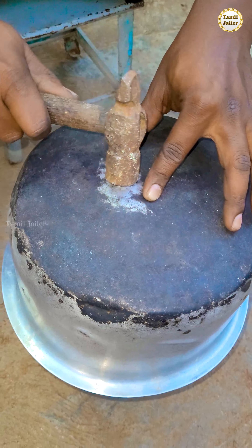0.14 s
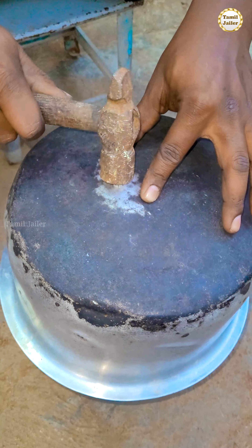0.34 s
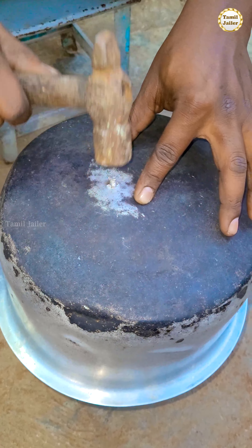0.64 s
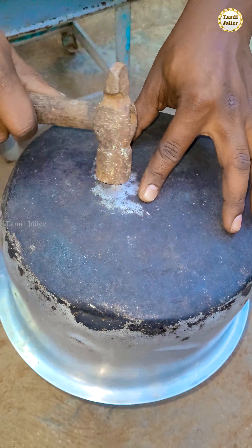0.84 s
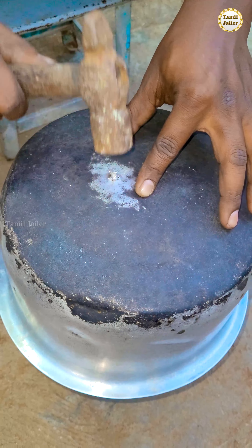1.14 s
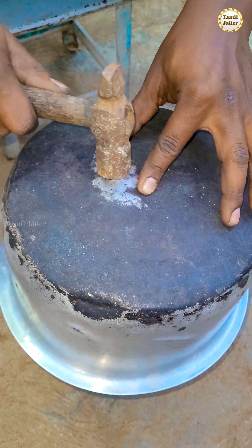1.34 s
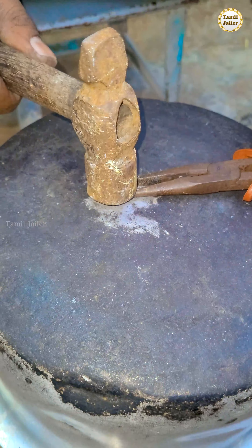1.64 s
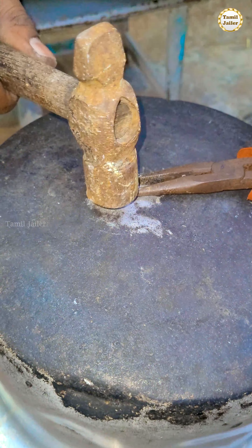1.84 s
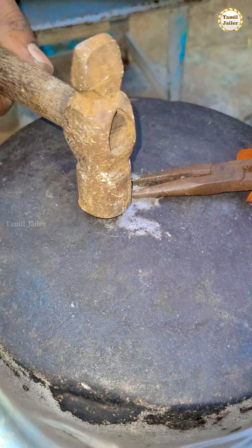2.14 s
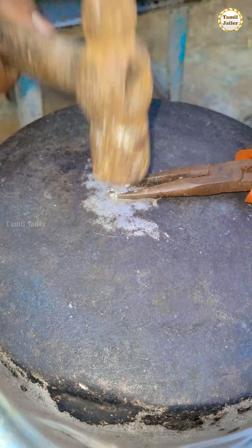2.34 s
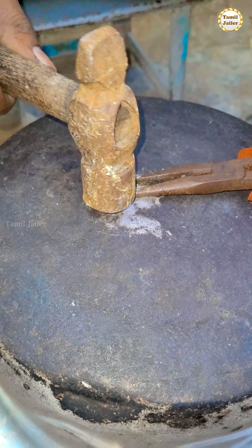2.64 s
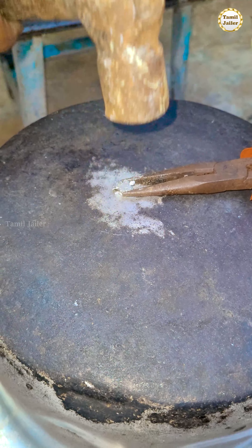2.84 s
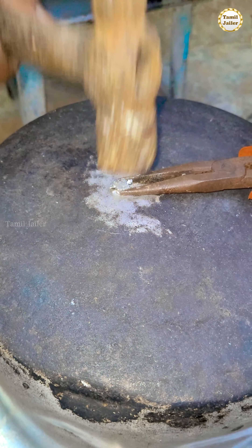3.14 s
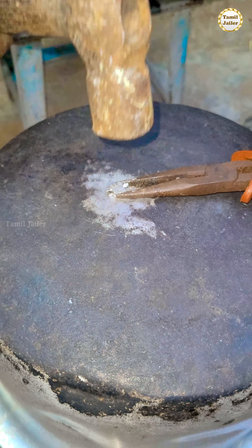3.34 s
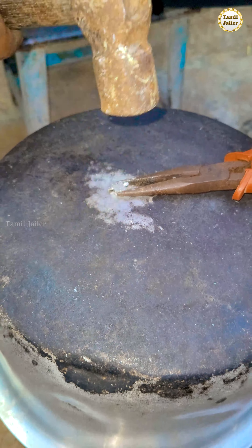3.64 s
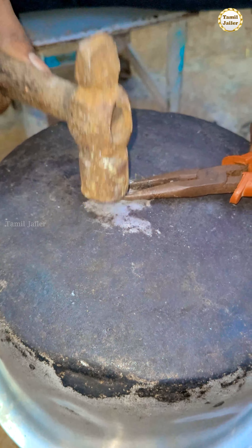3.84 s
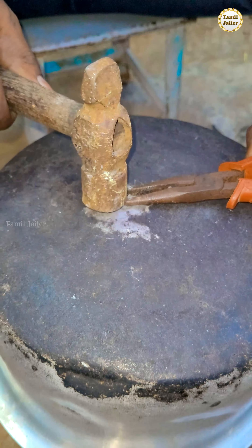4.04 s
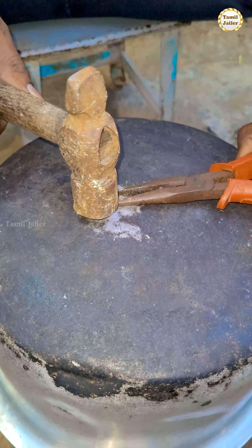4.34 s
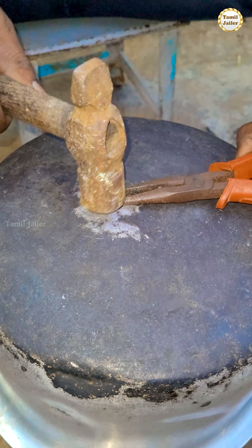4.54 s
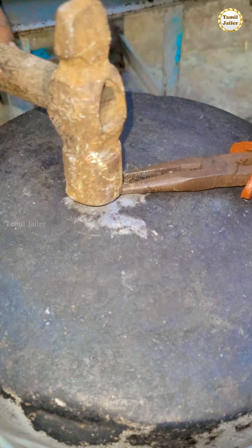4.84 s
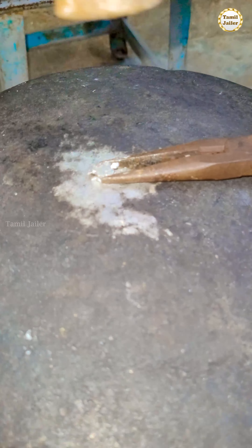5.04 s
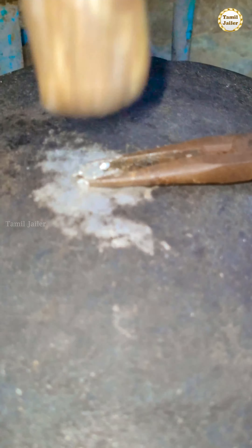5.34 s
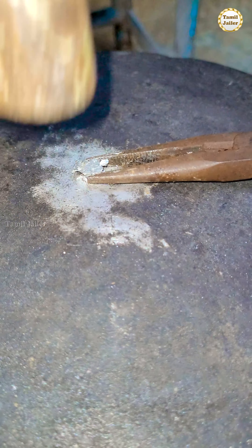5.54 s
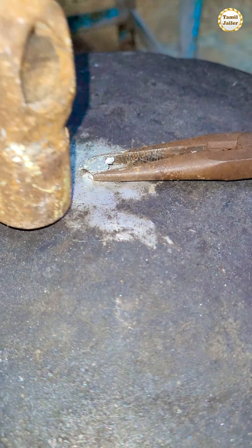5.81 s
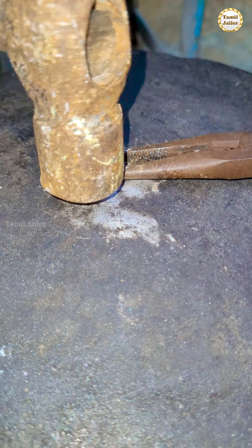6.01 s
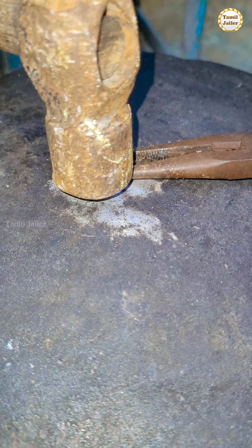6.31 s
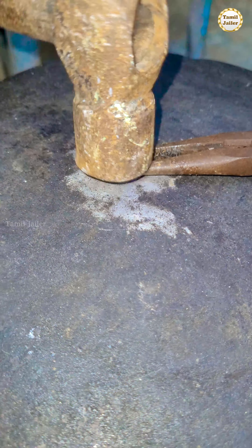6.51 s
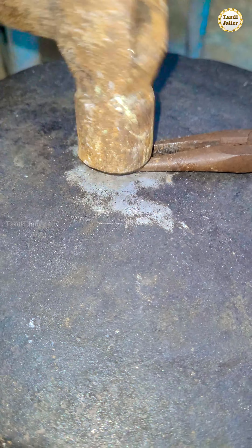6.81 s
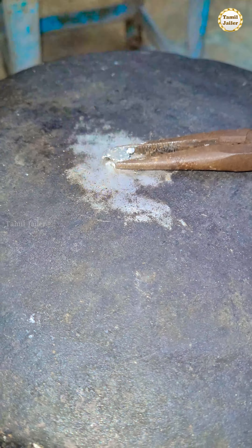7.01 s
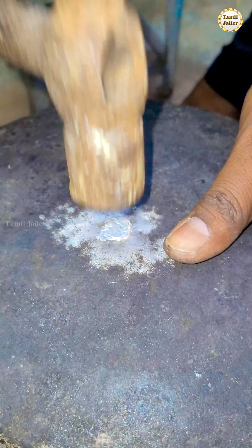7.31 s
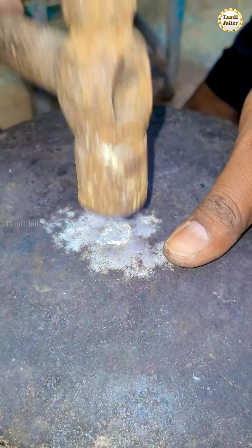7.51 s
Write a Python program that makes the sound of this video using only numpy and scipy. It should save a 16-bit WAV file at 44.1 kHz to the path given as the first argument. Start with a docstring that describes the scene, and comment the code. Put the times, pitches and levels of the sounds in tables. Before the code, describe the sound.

Close, hard hammer knocks on a thin aluminium pot bottom, quick and regular, with brief metallic ring between blows and faint street rumble.

```python
"""Flattening a plug in a pot

An upturned aluminium pot rests on an anvil, close to the microphone; a hammer flattens a plug in its bottom.
Each blow pins the bottom down: a short dull knock, made of one swing, damped sines and a crack of noise.
As the hammer lifts, the pot springs free and its modes, long decaying sines, ring until the next blow.
In three scenes fingers, then pliers, then a thumb steady it. Street rumble (noise) and far birds lie below.
"""
import sys
import numpy as np
from scipy import signal
from scipy.io import wavfile

SR = 44100
rng = np.random.default_rng(int(sys.argv[2]) if len(sys.argv) > 2 else 0)


def transcribe(signal):
    """Save signal, clipped to [-1, 1], as a 16-bit WAV file at the path in sys.argv[1]."""
    frames = np.atleast_2d(signal).T
    limited = np.clip(frames, -1, 1)
    pcm = np.round(limited * 32767).astype(np.int16)
    wavfile.write(sys.argv[1], SR, pcm)


N = 338247

# Hammer blows, levels before the shares of each source:
# start_s, level_db, lift_s (the head lifts), ring_low_db, ring_high_db
HAMMER_BLOWS = [(0.099, -13.5, 0.14, -38.5, -39.5), (0.326, -13.5, .364, -40.5, -38.5),
                (0.57, -14, .612, -44, -43.5), (0.821, -16.5, 0.86, -41, -44),
                (1.065, -13.5, 1.108, -39, -37.5), (1.312, -13.5, 1.353, -43.5, -42.5),
                (1.608, -20, 1.693, -57, -55.5), (1.886, -14, 1.934, -39, -39),
                (2.141, -15, 2.191, -39.5, -39.5), (2.408, -14.5, 2.476, -45, -44),
                (2.665, -11, 2.717, -40.5, -40), (2.943, -11.5, 2.993, -36.5, -41),
                (3.215, -13, 3.267, -44, -40.5), (3.482, -12, 3.532, -45.5, -38.5),
                (3.762, -13, 3.817, -41.5, -43), (4.034, -11, 4.085, -40.5, -40.5),
                (4.314, -10, 4.364, -37.5, -38), (4.593, -11, 4.648, -41, -38),
                (4.877, -9.5, 4.925, -40.5, -39), (5.158, -14.5, 5.2104, -37, -43.5),
                (5.423, -9, 5.47, -40.5, -37.5), (5.705, -9.5, 5.752, -38.5, -37),
                (6.006, -13.5, 6.058, -37, -41.5), (6.295, -10, 6.354, -37, -39.5),
                (6.575, -13, 6.636, -33.5, -43), (6.87, -12.5, 6.922, -35, -39.5),
                (7.163, -10.5, 7.211, -40, -38), (7.394, -14, 7.442, -78, -79.5),
                (7.595, -14.5, 7.642, -76, -76)]
# The pot bottom bounces on the anvil: start_s, level_db
ANVIL_BOUNCES = [(1.652, -24.5), (1.674, -26), (1.935, -37), (1.953, -33), (2.169, -36), (2.2, -36.5),
                 (2.436, -31.5), (2.457, -33.5), (2.469, -26.5), (2.48, -37.5), (2.689, -36), (3.267, -28),
                 (3.787, -24), (3.809, -29), (4.051, -27.5), (4.699, -36), (4.719, -42), (4.989, -37.5),
                 (5.189, -27.5), (5.545, -39.5), (5.735, -32.5), (5.829, -32.5), (6.028, -27),
                 (6.041, -29.5), (6.129, -36), (6.407, -32), (6.686, -35.5), (6.88, -21), (7.42, -43),
                 (7.443, -45.5), (7.615, -25), (7.627, -24), (7.651, -28)]
# Modes of the free pot under the fingers, then under the pliers: pitch_hz, level_db, t60_s
FREE_FINGER_MODES = [(272, -11, 0.5), (768, 2, 0.5), (786, 1, 0.52), (1896, -2, 0.42), (2646, -5, 0.8),
                     (2713, -21, 1.0), (2953, -25, 0.68), (3164, -17, 0.86), (3295, -22, 0.76),
                     (3402, -16, 0.21), (3513, -21, 0.21), (3588, -17, 0.39), (3832, -9, 0.38),
                     (3899, -20, 0.51), (4179, -11, 0.29), (4631, -20, 0.28), (4806, -30, 0.31),
                     (5227, -28, 0.25), (5923, -20, 0.23), (6444, -23, 0.23), (7296, -23, 0.21),
                     (8043, -32, 0.27)]
FREE_PLIER_MODES = [(272, -18, 0.4), (596, -8, 0.25), (619, 7, 0.4), (637, 4, 0.1), (722, -8, 0.15),
                    (1523, -15, 1.25), (2124, -21, 0.76), (2179, -19, 0.44), (2370, -24, 0.76),
                    (2541, -26, 1.5), (2731, -9, 0.27), (2821, -7, 0.34), (2881, -16, 0.57),
                    (3077, -6, 0.33), (3130, -25, 0.66), (3355, -6, 0.27), (3719, -12, 0.34),
                    (4040, -22, 0.29), (4192, -21, 0.35), (4574, -14, 0.28), (4755, -18, 0.31),
                    (4934, -13, 0.22), (5136, -11, 0.24), (5175, -16, 0.27), (5250, -10, 0.13),
                    (5336, -20, 0.32), (5450, -12, 0.13), (5533, -23, 0.31), (5858, -21, 0.38),
                    (6456, -30, 0.3)]
# Modes of the pot pinned under the hammer, before detuning and pressure: pitch_hz, level_db, t60_s
PINNED_FINGER_MODES = [(362, -14, 0.058), (570, -27, 0.036), (703, -54.5, .05), (899, -12.5, 0.088),
                       (1255, -5, 0.051), (1984, -21, 0.032), (2320, -11.5, 0.027), (3557, 1.5, 0.026),
                       (4200, -18, 0.082), (5200, -15, 0.023), (5130, -5, 0.072), (7560, -38, 0.08)]
PINNED_PLIER_MODES = [(348, -18.5, .08), (407.4, -14, 0.086), (537.4, -15, 0.098), (591, -19, 0.22),
                      (726, -35.5, 0.056), (771.7, -5.5, 0.06), (825, -15, 0.093), (956.4, -17, 0.093),
                      (2723, -6, 0.022), (2829, 0, 0.034), (3340, -27.5, 0.041), (4087, -11, 0.055),
                      (4740, -16.5, 0.064), (5680, -15.5, 0.017), (5430, -21.5, 0.023),
                      (5760, -23.5, 0.084), (7496, -13, 0.045)]
# Colour of a contact's crack, the countless small modes of the sheet: pitch_hz, fingers_db, pliers_db
CRACK_COLOUR = [(42.2, -41.5, -37.5), (126, -39.5, -30.5), (312, -12.5, -11), (740, -6, -13.5),
                (1630, -6, -10), (2300, -6.5, -13.5), (2800, -11, -7.5), (3770, -14, -14),
                (4700, -20.5, -6.5), (5500, -8.5, -12), (9500, -16, -13), (13000, -10.5, -19),
                (15500, -27, -16.5)]
# How fast the crack dies, then its longer tail: pitch_hz, t60_s
CRACK_DECAY = [(100, 0.19), (1000, 0.02), (4000, 0.036), (15000, 0.035)]
TAIL_DECAY = [(100, 0.79), (1000, 0.17), (4000, 0.16), (15000, 0.044)]
# Colour of the background, before its gain: pitch_hz, level_db
FLOOR_COLOUR = [(20, 4.5), (80, -9), (160, -8.5), (350, -19.5), (800, -20.5), (1500, -31.5), (3500, -32.5),
                (6000, -41), (16000, -41)]
# Far traffic swells and sinks under 200 Hz: time_s, level_db
TRAFFIC_SWELL = [(0, 4), (1.5, -0.5), (2.5, 1.5), (3.3, 1.5), (4.5, 1), (5.3, 1.5), (6.5, 0.5), (7.1, 4.5),
                 (7.67, -1)]
# Far bird notes: start_s, length_s, start_hz, end_hz, level_db
BIRD_NOTES = [(0.496, 0.045, 5600, 5300, -64), (0.683, 0.085, 6150, 5650, -65),
              (1.47, 0.13, 4850, 4700, -78), (3.195, 0.022, 3900, 3870, -61), (3.43, 0.05, 3850, 4300, -56),
              (3.675, 0.013, 4200, 4300, -53.5), (3.681, 0.07, 5130, 4900, -66),
              (3.898, 0.025, 4060, 4260, -59), (3.913, 0.078, 5100, 4840, -66),
              (4.014, 0.026, 3950, 4300, -55.5), (4.26, 0.059, 4200, 4400, -58.5),
              (6.7, 0.059, 10300, 8800, -71), (6.802, 0.042, 9500, 12100, -68),
              (7.52, 0.077, 5528, 5430, -59)]
# The bottom dishes in and springs back; rows are finger blows, plier blows, bounces:
# pitch_hz, crest_s (time to the strongest swing)
BOTTOM_SWINGS = [(800, .0014), (670, .0021), (450, .003)]

FLOOR_GAIN_DB = -35
# The scene changes here (s)
FINGER_SCENE_END_S, PLIER_SCENE_END_S = 1.502, 7.375
# A ring already under way: time of its blow (s), its lift (s), low and high level (dB)
EARLIER_RING = (-0.15, -0.09, -42.5, -42.5)
# Treble of a usual blow, under fingers and pliers (dB); a harder blow gains less treble (dB per dB)
BLOW_TREBLE_DB, USUAL_BLOW_DB, TREBLE_LAG = (-5, -0.87), -14, 0.45
# How hard the head stays pressed: finger blows, plier blows, bounces (1 = light)
PRESSURE = (1.27, 1.139, 1.18)
# Gains of the bottom's swing and of the pinned modes, for the same three kinds (dB)
SWING_DB, PINNED_DB = (1.55, -0.74, 0.0), (5.6, 2.2, 8.8)
# Click as the pot springs free, against its low ring level, under fingers and pliers (dB)
LIFT_CLICK_DB = (-3, -12.5)
# A bounce is soft, so dull, and takes some of the ring away (dB)
BOUNCE_TREBLE_DB, BOUNCE_LOSS_DB = -11.5, 1
# Once the head has lifted a bounce scuffs: early start (s), swell (s), decay (s), gain (dB)
SCUFF_LEAD_S, SCUFF_RISE_S, SCUFF_T60_S, SCUFF_DB = 0.0069, 0.003, 0.026, 6
# Huskiness of bird notes: gliding ones, and those that hold their pitch (0-1)
HUSKY, HUSKY_HELD = 0.52, 0.15
# A short delay of everything but the birds (s)
DELAY_S = 0.0007
# Level where peaks flatten (full scale = 1); low and high limits of the whole sound (Hz)
OVERLOAD, BASS_CUT_HZ, TREBLE_CUT_HZ = 0.285, 45, 17100


def from_db(db):
    """Gain of a level in dB."""
    return 10 ** (np.asarray(db) / 20)


def at_hz(points, hz, axis=1):
    """Read a column of a table at a pitch, interpolating on a log pitch axis."""
    points = np.array(points)
    return np.interp(np.log(hz), np.log(points[:, 0]), points[:, axis])


def add(out, start_s, sound):
    """Mix a sound in at a time."""
    i = round(start_s * SR)
    out[i:i + len(sound)] += sound[:N - i]


def bands():
    """Third-octave bands of white noise, neighbours unrelated, as (centre Hz, noise)."""
    edges = 20 * 2 ** np.arange(0, 9.9, 1 / 3)
    white = rng.standard_normal((2, N))
    for k, (low, high) in enumerate(zip(edges, edges[1:])):
        band = signal.butter(2, [low, high], "band", fs=SR, output="sos")
        yield np.sqrt(low * high), signal.sosfilt(band, white[k % 2])


def dying(clicks, t60, rise_s):
    """Envelope that swells after each click, then falls 60 dB in each t60."""
    fall = from_db(-60 / (t60 * SR))
    rise = np.exp(-1 / (rise_s * SR))
    return signal.lfilter([1 - rise], np.convolve([1, -fall], [1, -rise]), clicks + 1e-18)


def modes(table, t, tilt_db, scatter_db):
    """Gains and angular speeds of decaying modes: tilted above 1 kHz, strengths scattered anew each strike."""
    hz, level_db, t60 = np.transpose(table)[:, :, None]
    chance_db = scatter_db * rng.standard_normal((len(table), 1))
    gain = from_db(level_db + tilt_db * (hz > 1000) + chance_db - 60 * t / t60)
    return gain, 2 * np.pi * hz


def touches():
    """Blows and bounces as (start_s, level_db, treble_db, kind: 0 fingers, 1 pliers or thumb, 2 bounce)."""
    rows = []
    for start_s, level_db, *_ in HAMMER_BLOWS:
        kind = int(start_s > FINGER_SCENE_END_S)
        treble_db = BLOW_TREBLE_DB[kind] - TREBLE_LAG * (level_db - USUAL_BLOW_DB)
        rows.append((start_s, level_db, treble_db, kind))
    return rows + [(start_s, level_db, BOUNCE_TREBLE_DB, 2) for start_s, level_db in ANVIL_BOUNCES]


def is_free(s):
    """True once the hammer has been off the pot for 10 ms."""
    blow_s, _, lift_s = np.transpose(HAMMER_BLOWS)[:3]
    return s > lift_s[np.searchsorted(blow_s, s, side="right") - 1] + 0.01


def street():
    """Steady background noise, coloured band by band; far traffic swells and sinks in its lows."""
    out = np.zeros(N)
    swell = from_db(np.interp(np.arange(N) / SR, *np.transpose(TRAFFIC_SWELL)))
    for hz, noise in bands():
        level = from_db(FLOOR_GAIN_DB + at_hz(FLOOR_COLOUR, hz))
        out += noise * level * (swell if hz < 200 else 1)
    return out


def birds():
    """Whistles whose pitch glides or holds, made husky by a random flutter as if blurred by distance."""
    out = np.zeros(N)
    flutter = signal.lfilter([1], [1, -1.95, 0.950625], rng.standard_normal(N))
    flutter /= flutter.std()
    for start_s, length_s, start_hz, end_hz, level_db in BIRD_NOTES:
        n = round(length_s * SR)
        phase = 2 * np.pi * np.cumsum(np.geomspace(start_hz, end_hz, n)) / SR
        held = abs(np.log(end_hz / start_hz)) < 1 / 100
        husky = HUSKY_HELD if held else HUSKY
        voice = 1 - husky + husky * flutter[round(start_s * SR):][:n]
        add(out, start_s, from_db(level_db) * np.sqrt(np.hanning(n)) * voice * np.sin(phase))
    return out


def cracks():
    """Every contact throws out noise that dies band by band; bounces of the free pot scuff instead."""
    out = np.zeros(N)
    lift_clicks = [(lift_s, low_db + LIFT_CLICK_DB[int(start_s > FINGER_SCENE_END_S)], 0)
                   for start_s, _, lift_s, low_db, _ in HAMMER_BLOWS]
    contacts = np.array([touch[:3] for touch in touches()] + lift_clicks)
    start_s, level_db, treble_db = contacts.T
    soft = is_free(start_s)
    at = np.round((start_s - SCUFF_LEAD_S * soft) * SR).astype(int)
    fingers = start_s < FINGER_SCENE_END_S
    thumb = start_s > PLIER_SCENE_END_S
    tail_db = np.where(fingers | thumb, -26, -21)   # fingers and thumb soak up more

    scuffs = np.zeros(N)
    scuffs[at[soft]] = from_db(level_db[soft] + SCUFF_DB)
    scuffs = dying(scuffs, SCUFF_T60_S, SCUFF_RISE_S)
    # a random flutter of level makes the treble of the cracks grainy
    grain = signal.lfilter([1], [1, -1.8, 0.81], rng.standard_normal(N))
    grain = from_db(2.5 * grain / grain.std())

    for hz, noise in bands():
        pliers_db = at_hz(CRACK_COLOUR, hz, axis=2)
        colour_db = np.where(fingers, at_hz(CRACK_COLOUR, hz, axis=1), pliers_db)
        colour_db += 1.8 * rng.standard_normal(len(at))   # each contact has its own tint
        clicks, tails = np.zeros((2, N))
        clicks[at] = from_db(level_db + treble_db * (hz > 1500) + colour_db + 9.5)
        tails[at] = clicks[at] * from_db(tail_db)
        clicks[at[soft]] = 0   # the scuff stands in for the click
        rise_s = 0.00041 + 0.15 / hz   # lows build more slowly
        crack = dying(clicks, at_hz(CRACK_DECAY, hz), rise_s)
        crack += dying(tails, at_hz(TAIL_DECAY, hz), 0.017)
        crack += scuffs * from_db(pliers_db + BOUNCE_TREBLE_DB * (hz > 1500))
        out += noise * crack * (grain if hz > 2000 else 1)
    return out


def rings():
    """Free modes keep the phase of their blow, hum faintly when pinned, open at the lift, stop at the next blow."""
    out = np.zeros(N)
    scene_ends = (FINGER_SCENE_END_S, PLIER_SCENE_END_S)
    stops = np.sort([blow[0] for blow in HAMMER_BLOWS] + list(scene_ends) + [N / SR])
    rows = [EARLIER_RING] + [(blow_s, lift_s, *ring) for blow_s, _, lift_s, *ring in HAMMER_BLOWS]
    for blow_s, lift_s, low_db, high_db in rows:
        start_s = max(blow_s, 0)
        stop_s = stops[stops > lift_s][0]
        now = start_s + np.arange(round((stop_s - start_s) * SR)) / SR
        fingers = lift_s < FINGER_SCENE_END_S
        table = FREE_FINGER_MODES if fingers else FREE_PLIER_MODES
        gain, w = modes(table, now - lift_s, high_db - low_db, scatter_db=2.5)
        if fingers:
            pinned, rise_s = from_db(-12.5), 0.0015
        else:   # high modes are held less
            pinned, rise_s = from_db(np.where(w > 2 * np.pi * 2600, -9, -16)), 0.0025
        opening = pinned + (1 - pinned) * (1 - np.exp(-np.maximum(now - lift_s, 0) / rise_s))
        fade_s = 0.04 if stop_s in scene_ends else 0.001   # the ring fades out at a scene change
        closing = np.clip((stop_s - now) / fade_s, 0, 1)
        lost_db = sum(BOUNCE_LOSS_DB * np.clip((now - s) / 0.0062, 0, 1)
                      for s, _ in ANVIL_BOUNCES if lift_s < s < stop_s)
        ring = np.sum(opening * gain * np.sin(w * (now - blow_s)), axis=0)
        add(out, start_s, from_db(low_db - lost_db) * closing * ring)
    return out


def knocks():
    """Blows and bounces: one short swing of the whole bottom, then the pinned modes, damped by pressure."""
    out = np.zeros(N)
    t = np.arange(SR // 10) / SR
    for start_s, level_db, treble_db, kind in touches():
        # contacts under the thumb and the first blow under the pliers die faster
        thumb = start_s > PLIER_SCENE_END_S
        first_pliers = kind == 1 and start_s < FINGER_SCENE_END_S + 0.3
        damping = PRESSURE[kind] + 0.3 * (thumb or first_pliers)
        hz, crest_s = BOTTOM_SWINGS[kind]
        swing = (t / crest_s * np.exp(1 - t / crest_s)) ** 3 * np.sin(2 * np.pi * hz * t)
        table = PINNED_PLIER_MODES if kind else PINNED_FINGER_MODES
        gain, w = modes(table, t * damping ** 3, treble_db + 1.0, scatter_db=3.0)
        # no two contacts pin the same spot
        detune = 1 + rng.standard_normal((len(table), 1)) / 150
        swell = 1 - np.exp(-t / 0.0033)
        pinned = swell * np.sum(gain * np.sin(w * detune * t), axis=0)
        knock = from_db(SWING_DB[kind]) * swing + from_db(PINNED_DB[kind]) * pinned
        add(out, start_s, from_db(level_db) * knock)
    return out


def scene():
    """All sources at one microphone: street and pot slightly delayed, birds mixed in."""
    street_and_pot = street() + cracks() + rings() + knocks()
    return (np.roll(street_and_pot, round(DELAY_S * SR)) + birds())[None]


def record(dry):
    """The blows overload and flatten at the top; deep bass and the highest treble are filtered off."""
    flat = dry / (1 + (dry / OVERLOAD) ** 8) ** (1 / 8)
    bass_cut = signal.butter(2, BASS_CUT_HZ, "high", fs=SR, output="sos")
    treble_cut = signal.cheby2(16, 60, TREBLE_CUT_HZ, fs=SR, output="sos")
    return signal.sosfilt(treble_cut, signal.sosfilt(bass_cut, flat))


dry = scene()
out = record(dry)
transcribe(out)
```